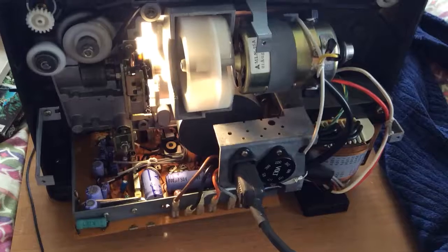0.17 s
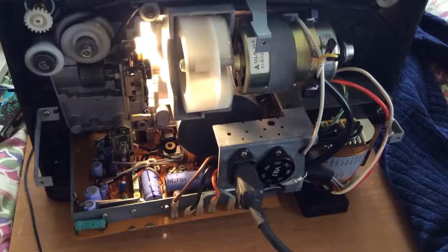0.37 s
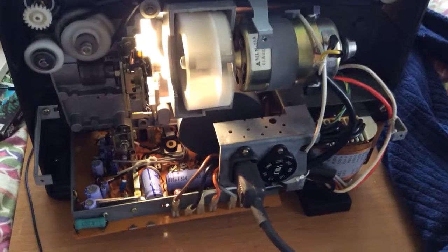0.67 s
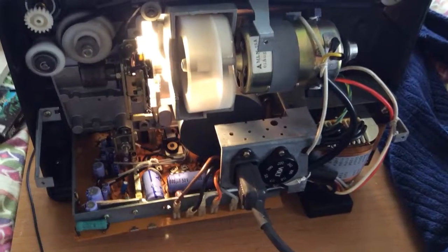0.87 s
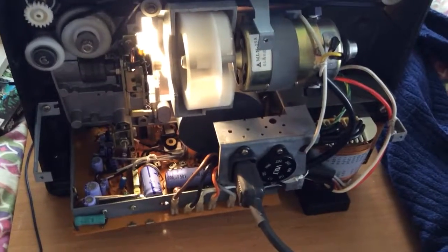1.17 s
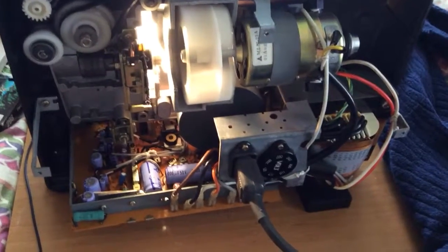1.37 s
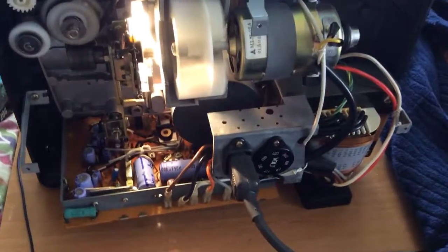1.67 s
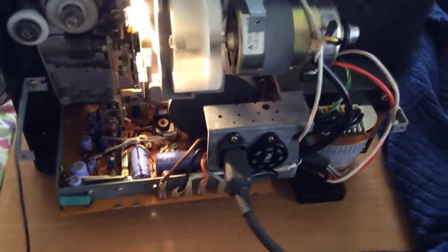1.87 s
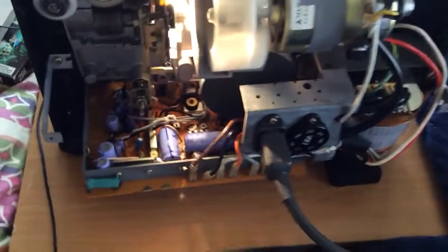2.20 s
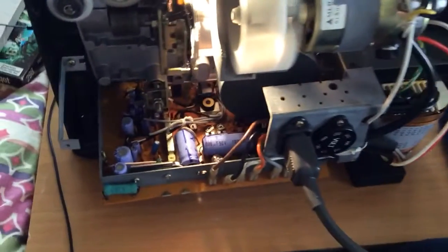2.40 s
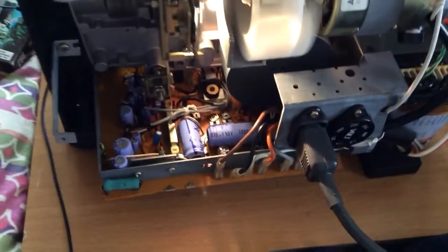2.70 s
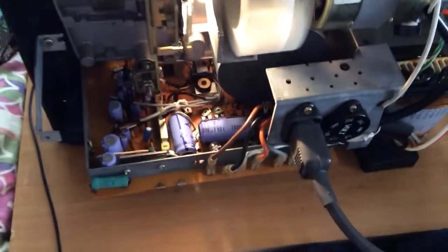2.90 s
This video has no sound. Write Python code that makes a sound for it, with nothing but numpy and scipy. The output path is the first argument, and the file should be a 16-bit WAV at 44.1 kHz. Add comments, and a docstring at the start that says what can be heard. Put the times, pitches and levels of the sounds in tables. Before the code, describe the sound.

Film projector clattering rapidly and evenly over a faint motor whine and fan whirr.

```python
"""The fast clatter of an open film projector on a table, over a whining, humming motor and a whirring fan.
Once a frame the claw slides, snaps against its metal guide and knocks the chassis; the gears repeat
their rattle on every turn. A low rumble swells briefly, then comes one dull bump.
Towards the end the listening phone leans in: the claw's ring shifts colour and the machine grows louder."""
import sys
import numpy as np
from scipy import signal
from scipy.fft import rfft, irfft
from scipy.io import wavfile
from scipy.ndimage import uniform_filter1d

SR = 44100
rng = np.random.default_rng(int(sys.argv[2]) if len(sys.argv) > 2 else 0)


def output_pcm(signal):
    """Save a mono or channel-first signal as 16-bit PCM at the path in sys.argv[1].

    Samples are clipped to [-1, 1] before scaling.
    """
    pcm = np.clip(np.atleast_2d(signal).T, -1, 1) * 32767
    wavfile.write(sys.argv[1], SR, np.round(pcm).astype(np.int16))


N = 134505
TIME, BIN_HZ = np.arange(N) / SR, np.arange(N // 2 + 1) * SR / N
FRAME_S, FIRST_SNAP_S = 0.04191983, 0.0946


def undb(db):
    return 10 ** (np.asarray(db) / 20)

def curve(table):
    """Straight lines through (seconds, value) points."""
    return np.interp(TIME, *np.array(table).T)

def shape(x, gain):
    """Filter by a gain per frequency bin; rms 1."""
    y = irfft(rfft(x) * gain, N)
    return y / y.std()

def colour(x, table):
    """EQ a noise through (Hz, dB) points; rms 1."""
    hz, db = np.array(table).T
    return shape(x, undb(np.interp(np.log(BIN_HZ + 1), np.log(hz), db)))

def resonance(hz, width_hz):
    """Noise in one steep resonance."""
    return shape(rng.standard_normal(N), 1 / (1 + ((BIN_HZ - hz) / width_hz * 1.02) ** 2))

def drift(rate):
    """Smooth random motion, `rate` new values a second; spread near 1."""
    hold = int(SR / rate)
    steps = np.repeat(rng.standard_normal(N // hold + 1), hold)
    return 1.2 * uniform_filter1d(uniform_filter1d(steps, hold), hold)[:N]

def rattle(age, spectrum, repeat):
    """Dense vibration; the share `repeat` comes back alike on every turn."""
    size = round(FRAME_S * SR)
    turn = irfft(np.exp(2j * np.pi * rng.random(size // 2 + 1)), size) * np.sqrt(size)
    looped = np.sqrt(repeat) * turn[(age * SR).astype(int) % size]
    return colour(looped + np.sqrt(1 - repeat) * rng.standard_normal(N), spectrum)

def frame_clock():
    """For each sample: frame number, seconds since the last snap (age) and to the next (ahead)."""
    snaps = FIRST_SNAP_S + FRAME_S * np.arange(-3, N / SR / FRAME_S + 1)
    wander = 0.00008 * np.interp(snaps, TIME, drift(4))
    jitter = 0.00003 * rng.standard_normal(len(snaps))
    snaps = snaps + wander + jitter
    frame = np.searchsorted(snaps, TIME) - 1
    return frame, TIME - snaps[frame], snaps[frame + 1] - TIME


# The whine's harmonics. Each entry: relative level in dB, fundamental first.
WHINE_HARMONICS = [-52, -66, -81, -64]
def motor_whine(lean, pitch_hz=1026.2, shaft_hz=48.87):
    """A steady whine with a slight flutter; each turn of the shaft sways its pitch."""
    sway = 0.027 * np.sin(2 * np.pi * shaft_hz * TIME)
    hz = pitch_hz * (1 + sway + 0.00057 * drift(3.26) + 0.0015 * drift(60.6))
    phase = 2 * np.pi * np.cumsum(hz) / SR
    tone = sum(undb(db) * np.sin(k * phase) for k, db in enumerate(WHINE_HARMONICS, 1))
    return np.sqrt(2) * tone * undb(3.4 * lean + 0.5 * drift(9.1) - 2.4)

# The hum's fader ride. Each row: time in seconds, level in dB.
HUM_RIDE = [(0, -61.5), (1.6, -71.5), (1.72, -55.5), (1.87, -68), (2.05, -53.5), (2.12, -60.5), (2.7, -62),
            (2.82, -56), (2.93, -67)]
def motor_hum():
    """The motor's low, wavering hum."""
    return undb(curve(HUM_RIDE)) * resonance(177, width_hz=24)

# The colour of the fan's air. Each row: frequency in Hz, relative level in dB.
FAN_EQ = [(20, -30), (34, 0), (48, 3.5), (85, 3), (125, 2), (190, -0.5), (270, -2), (500, -6), (950, -1.5),
          (1500, -4), (2400, -14), (6300, -20.5), (9000, -13.5), (13000, -16.5), (15000, -24.5)]
def fan(lean):
    """Moving air lays a soft bed under the clatter."""
    return undb(-52 + 0.2 * drift(5.65) + 0.78 * lean) * colour(rng.standard_normal(N), FAN_EQ)

# The colour of the gear train. Each row: frequency in Hz, relative level in dB.
GEAR_EQ = [(100, -13.5), (180, 1), (260, -7.5), (380, 4.5), (470, -5), (620, 3.5), (770, -3), (930, 7.5),
           (1080, -3), (1200, -9), (1550, -1.5), (2300, -16.5), (3300, -24), (6500, -9), (9000, -27),
           (13000, -49), (15000, -9)]
def gears(age, lean):
    """The gears rattle much the same way on every turn."""
    return undb(-52 + 2.4 * drift(11.54) + 2.5 * lean) * rattle(age, GEAR_EQ, repeat=0.74)

def spring():
    """A spring keeps ringing, thin and high."""
    return undb(-59.5) * resonance(4970, width_hz=120)

def claw_slide(age, ahead):
    """The sliding claw sings up into each snap and fades just after it."""
    envelope = np.exp(-np.minimum(ahead / 0.0044, age / 0.0029))
    return undb(-53) * envelope * resonance(8080, width_hz=160)

# The bright edge of claw on guide. Each row: frequency in Hz, relative level in dB.
CONTACT_EQ = [(600, -40), (1500, -59), (2800, -17), (5000, 6.5), (6400, 1), (8000, -17), (9000, 0.5),
              (11300, -3.5), (13100, 1), (15000, -5)]
def claw_snap(age, ahead, force):
    """The claw scrapes for an instant, then hits its guide with a crack."""
    scrape = undb(-41) * np.exp(-ahead / 0.00054) * rattle(age, CONTACT_EQ, repeat=0.17)
    envelope = np.minimum(age / 0.000067, 1) * np.exp(-age / 0.00093)
    crack = undb(-32.5) * envelope * rattle(age, CONTACT_EQ, repeat=0.52)
    return scrape + force * crack

# The metal modes of claw and guide. Each row: pitch in Hz, level in dB from afar, level in dB
# leaned in, seconds to fall 60 dB, delay after the snap in seconds.
CLAW_MODES = [(2920, -45.5, -50, 0.045, 0.001573), (3315, -47, -47.5, 0.076, 0.000574),
              (3520, -46.5, -42.5, .032, 0.000571), (4596, -45, -42, 0.027, 0.000592),
              (5690, -47, -30.5, 0.021, 0.00009), (6090, -36.5, -30.5, 0.012, 0.000017),
              (6740, -27.5, -28, 0.013, 0.000099), (6966, -30.5, -33.5, 0.021, 0.0006015),
              (7507, -39, -45, 0.022, .0015), (7970, -28.5, -32.5, 0.012, 0.000787),
              (10840, -35.5, -31.5, 0.013, 0.0002076), (11530, -32.5, -30, 0.0087, 0.00012),
              (12630, -44, -45, 0.0086, 0.00022), (13440, -35, -39, 0.014, 0.000092),
              (14730, -34, -35, 0.01, 0.000072)]
def claw_ring(frame, age, lean, contact_s=0.00035):
    """Each snap rings the metal, every mode a little different in level and tuning each time."""
    ring = 0
    for hz, far_db, near_db, t60, delay in CLAW_MODES:
        scatter, detune = rng.standard_normal((frame.max() + 1, 2))[frame].T
        since = np.maximum(age - delay, 0)
        level = undb(far_db + (near_db - far_db) * lean + 1.67 * scatter)
        envelope = np.clip(since / contact_s, 0, 1) * np.exp(-np.log(1000) * since / t60)
        ring += level * envelope * np.sin(2 * np.pi * hz * (1 + 0.0042 * detune) * since)
    return ring

# The body of the case. Each row: frequency in Hz, relative level in dB.
CASE_EQ = [(300, -25), (1200, -16), (2000, -7), (2500, -12.5), (3300, -1.5), (4100, -4.5), (4700, -3.5),
           (5500, -6), (6300, 1.5), (7300, 0.5), (9000, -10), (11000, -12), (15000, -12)]
def case_knock(age, lean, rise_s=0.0025, decay_s=0.0036):
    """Each snap spreads through the case."""
    envelope = (1 - np.exp(-(age / rise_s) ** 2)) * np.exp(-age / decay_s)
    return undb(-28 + 4.2 * lean) * envelope * rattle(age, CASE_EQ, repeat=0.77)

# The colour of the room's tail. Each row: frequency in Hz, relative level in dB.
ROOM_EQ = [(500, -64), (2300, 6.5), (3400, 12.5), (4200, 5), (6400, 8.5), (7400, 5), (9000, -10),
           (11000, 8.5), (13200, -19), (15000, -16)]
def room_tail(age, rise_s=0.013, decay_s=0.026):
    """Each snap dies away in the room until the next one lands."""
    envelope = np.minimum(age / rise_s, 1) * np.exp(-age / decay_s)
    return undb(-47) * envelope * rattle(age, ROOM_EQ, repeat=0.42)

# The knocks in one turn of the cam. Each row: seconds after the snap, pitch in Hz,
# half-width in seconds, level in dB from afar.
CAM_KNOCKS = [(.0054, 1540, 0.0015, -48.5), (.0076, 1840, 0.00064, -49), (.0097, 967, 0.001, -41),
              (0.0155, 1010, 0.00091, -50)]
def cam(frame, age, lean):
    """The turning cam knocks out four brief midrange rings a frame."""
    knocks = 0
    for at, hz, width, db in CAM_KNOCKS:
        level = undb(db + 0.6 * rng.standard_normal(frame.max() + 1))[frame]
        envelope = np.exp(-((age - at) / width) ** 2 / 2)
        knocks += level * envelope * np.sin(2 * np.pi * hz * (age - at))
    return knocks * undb(2.5 * lean)

def rumble(peak_s=0.43, half_width_s=0.071):
    """A low rumble swells once, briefly."""
    swell = np.exp(-((TIME - peak_s) / half_width_s) ** 2)
    return undb(-53.5) * swell * resonance(131, width_hz=104)

# The bump's low modes. Each row: pitch in Hz, level in dB.
BUMP_MODES = [(125, -39), (270, -50), (520, -39)]
def bump(start_s=1.0135, decay_s=0.0028):
    """One soft, dull bump whose modes die within a cycle or two."""
    since = np.maximum(TIME - start_s, 0)
    modes = sum(undb(db) * np.sin(2 * np.pi * hz * since) for hz, db in BUMP_MODES)
    return np.exp(-since / decay_s) * modes

# The phone's move towards the projector. Each row: time in seconds, closeness from 0 to 1.
LEAN_IN = [(0, 0.08), (1.6, 0), (2.2, 0.3), (2.7, 1), (3.05, 0.85)]
def scene():
    """Mix the projector in mono, with claw, cam and gears on one frame clock."""
    frame, age, ahead = frame_clock()
    lean = curve(LEAN_IN)
    force = undb(0.52 * rng.standard_normal(frame.max() + 1))[frame]  # no two snaps hit equally hard
    bed = motor_whine(lean) + motor_hum() + fan(lean) + gears(age, lean) + spring()
    claw = claw_slide(age, ahead) + claw_snap(age, ahead, force)
    ring_out = force * (claw_ring(frame, age, lean) + case_knock(age, lean) + room_tail(age))
    return (bed + claw + ring_out + cam(frame, age, lean) + rumble() + bump())[None]

def record(dry, start_s=0.084):
    """The sound cuts in after a moment of silence, with the deepest bass and the top trimmed."""
    low_cut = signal.butter(4, 36, "high", fs=SR, output="sos")
    high_cut = signal.ellip(8, 0.2, 70, 15100, fs=SR, output="sos")
    gated = signal.sosfilt(low_cut, dry) * (TIME > start_s)
    return signal.sosfilt(high_cut, gated)


dry = scene()
out = record(dry)
output_pcm(out)
```